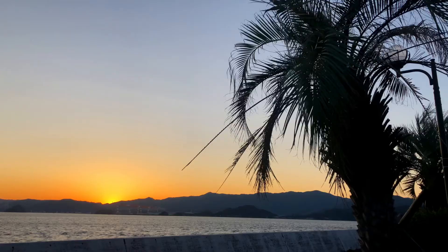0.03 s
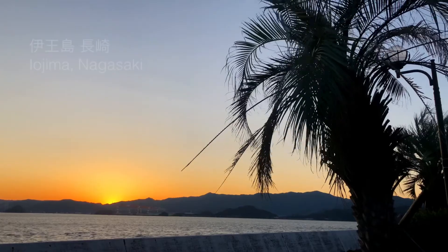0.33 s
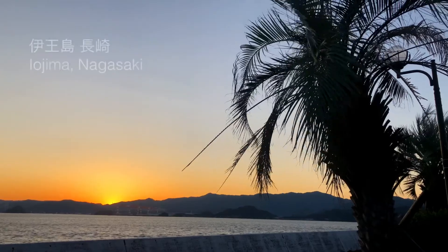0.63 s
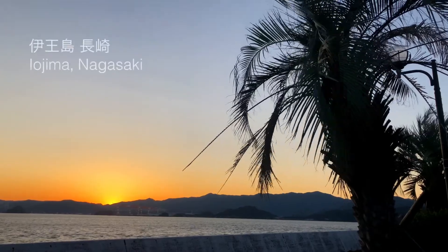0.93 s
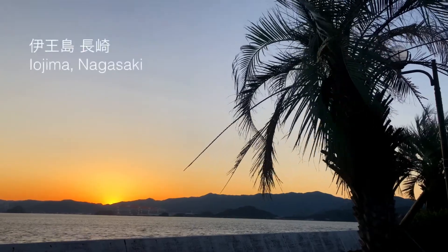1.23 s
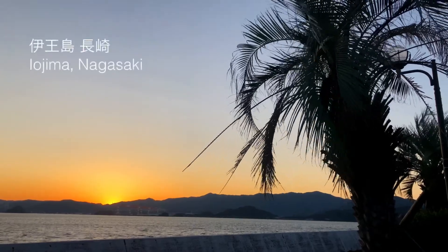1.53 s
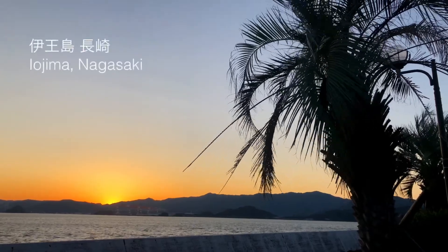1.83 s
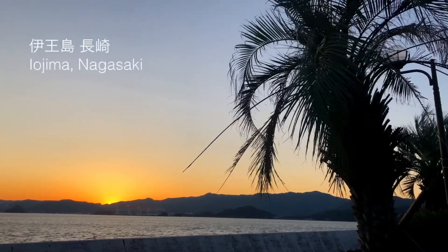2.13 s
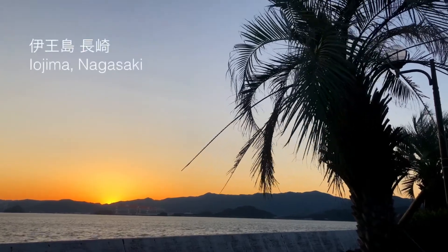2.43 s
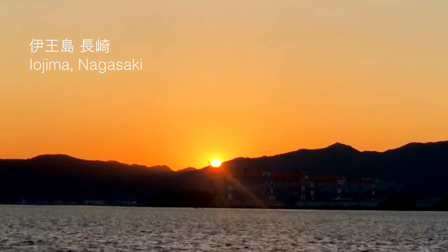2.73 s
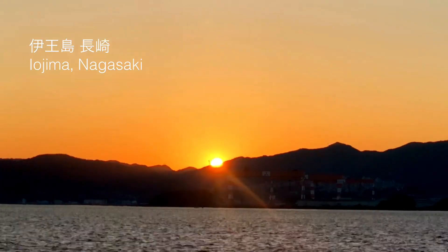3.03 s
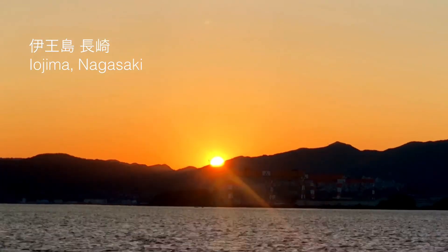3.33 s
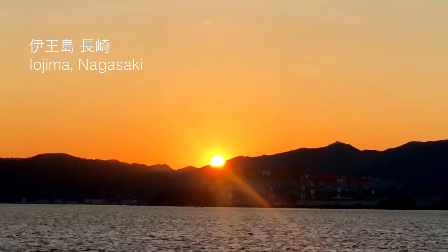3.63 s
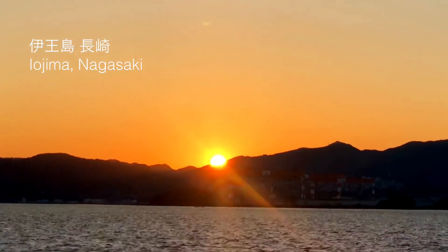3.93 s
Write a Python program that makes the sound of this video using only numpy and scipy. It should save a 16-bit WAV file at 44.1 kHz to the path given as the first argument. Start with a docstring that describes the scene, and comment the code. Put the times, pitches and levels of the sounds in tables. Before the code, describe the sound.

Small sea waves wash steadily against a wall, fading in from silence over about three seconds. A breeze rumbles on the microphone, with soft buffets near 1.3 seconds and from 2.4 to 2.8. A distant boat engine hums in and out, strongest around 2.4. Faint crickets chirp and trill throughout. Water sloshes hollowly around 3.5 seconds, and dry palm leaves tick near 1 and 3.7 seconds.

```python
"""Small waves fade in, washing steadily against a sea wall at dusk, with a hollow slosh now and then.
A breeze rumbles on the microphone and carries a low drone, like a distant boat engine, in and out.
Crickets scrape their wings on the bank: falling notes, short high trills and, later, level chirps.
Dry palm leaves tick against each other over a faint rustle."""
import sys
import numpy as np
from scipy import signal
from scipy.fft import rfft, irfft
from scipy.io import wavfile
from scipy.ndimage import uniform_filter1d

SR = 44100
rng = np.random.default_rng(int(sys.argv[2]) if len(sys.argv) > 2 else 0)


def materialize(psi):
    """Save the field psi as 16-bit PCM at rate SR to the path in sys.argv[1].

    A 1-D psi becomes a single channel; in a 2-D psi each row is a channel.
    """
    bounded = np.clip(np.atleast_2d(psi).T, -1, 1)
    quanta = np.round(bounded * 32767).astype(np.int16)
    wavfile.write(sys.argv[1], SR, quanta)


N = 176400
T = np.arange(N) / SR

# Fader ride of the wash, set in its 900-3000 Hz band: time_s, level_db
WASH_RIDE = [(0.2, -52), (0.5, -50), (0.8, -50), (1.05, -50), (1.3, -50), (1.6, -50.5), (1.9, -50),
             (2.15, -50.5), (2.45, -50), (2.8, -50.5), (3.15, -50.5), (3.5, -50.5), (3.95, -52)]
# EQ of the wash: frequency_hz, gain_db
WASH_EQ = [(18, -29), (45, 12.5), (150, 4.5), (400, 3.5), (750, 0), (1300, -1), (1900, -4.5), (3000, -7.5),
           (5200, -9), (6700, -11), (7700, -13), (8400, -12.5), (9700, -17), (11200, -16.3), (13600, -20.5),
           (15600, -27)]
# Fader ride of the hollow slosh at the wall: time_s, level_db
SLOSH_RIDE = [(.2, -54), (.6, -53), (1.0, -55), (1.6, -74), (2.1, -53), (2.4, -78), (2.9, -55.5),
              (3.45, -48), (3.75, -51), (3.98, -52)]
# EQ of the slosh: frequency_hz, gain_db
SLOSH_EQ = [(30, -55), (150, -28), (330, -0.5), (470, 3), (680, 1.5), (900, -10.5), (1600, -8.5),
            (4000, -49)]

# Fader ride of the breeze, set in its 88-230 Hz band: time_s, level_db
BREEZE_RIDE = [(0.15, -42), (0.6, -42), (1.0, -36), (1.12, -45), (1.48, -43), (1.75, -39.5), (2.05, -42),
               (2.2, -38.5), (2.42, -43.5), (2.62, -45), (2.84, -36.5), (3.0, -44.5), (3.3, -46.5),
               (3.7, -44.5), (3.98, -43.5)]
# EQ of the breeze: frequency_hz, gain_db
BREEZE_EQ = [(10, -40), (22, -53), (32, -23), (42, -13), (58, 2.5), (110, 4), (160, 0), (220, -3.5),
             (270, -6.5), (340, -12), (480, -25), (1200, -37), (4000, -88)]
# Short low thumps, mostly of wind, with a brief low swell at 2.383 s: middle_s, length_s, level_db
LOW_BUFFETS = [(1.23, 0.073, -30), (1.338, 0.039, -28.5), (2.383, .04, -35), (2.45, 0.033, -37),
               (2.526, 0.023, -30.5), (2.84, 0.055, -31)]
# EQ of the buffets: frequency_hz, gain_db
BUFFET_EQ = [(22, -38), (45, 4), (90, -1.5), (150, -2), (240, -6), (340, -9), (480, -37), (1500, -60)]

# Fader ride of the engine's firing tone: time_s, level_db
FIRING_RIDE = [(0.15, -69), (0.38, -39.7), (0.55, -40.5), (0.75, -37.5), (1.3, -42), (1.47, -61),
               (1.62, -61), (2.05, -35.5), (2.18, -59), (2.3, -35.6), (2.42, -30), (2.56, -57), (2.85, -44),
               (3.04, -39), (3.14, -52), (3.55, -50), (3.7, -37.5), (3.9, -61)]
# Steadier tones of the engine: pitch_hz, level_db
ENGINE_OVERTONES = [(146.5, -46), (219, -50.5), (240, -50)]
# Trim on those tones, sinking as the engine draws away: time_s, gain_db
OVERTONE_TRIM = [(.2, -1.5), (1.4, -1.5), (2.6, -0.5), (3.2, -7.5), (4.0, -8)]

# Falling cricket notes: middle_s, pitch_hz, level_db, roughness (0 pure, 1 all rasp)
CRICKET_NOTES = [(.152, 3830, -52, .02), (.23, 3830, -50, 0.05), (.317, 3750, -52, 0.1),
                 (.402, 3740, -54, .05), (.48, 3770, -55, .05), (.56, 3750, -56, 0.2), (.64, 3670, -60, .3),
                 (1.165, 3380, -59, .5), (1.345, 3700, -58, .4), (1.42, 3520, -62, .4),
                 (1.57, 3620, -54, .05), (1.78, 3650, -53, 0.2), (1.955, 3580, -56, .5),
                 (2.01, 3700, -58, .5), (2.445, 3620, -61, .5), (2.53, 3740, -52, 0.9),
                 (2.61, 3870, -53, .7), (2.695, 3730, -54.5, 0.5), (2.805, 3930, -52, 0.8),
                 (2.895, 3880, -60, .6), (2.982, 3870, -53, .6)]
# High cricket trills: start_s, length_s, level_db
CRICKET_TRILLS = [(.405, .07, -53), (0.584, .095, -53.5), (0.787, 0.1, -54), (1.001, 0.075, -53.5),
                  (1.226, 0.092, -53.5), (1.448, 0.094, -54), (2.368, 0.076, -55), (2.541, .09, -53),
                  (2.759, 0.09, -54.5), (2.984, 0.084, -55), (3.191, 0.09, -54), (3.41, 0.09, -55.5)]
# Level cricket chirps: middle_s, level_db
CRICKET_CHIRPS = [(3.058, -54.5), (3.137, -56), (3.222, -55), (3.307, -53), (3.39, -55.5), (3.477, -54.5),
                  (3.558, -54.5), (3.647, -55), (3.73, -54), (3.872, -59), (3.93, -58), (3.988, -56)]

# Frond striking frond: start_s, level_db, decay_s
LEAF_TICKS = [(.42, -44, .006), (.748, -47, .004), (1.026, -38, .004), (1.034, -45, .012),
              (1.233, -45, .005), (1.428, -46, .002), (3.6405, -39, .003), (3.672, -46, .002),
              (3.7662, -31, .0014), (3.769, -41, .003)]
# EQ of the dry leaves: frequency_hz, gain_db
LEAF_EQ = [(1000, -29), (4500, -8), (5400, 3.5), (8500, 2.5), (11000, -2), (13000, -6), (16000, -6)]


def amp(db):
    """Decibels to gain."""
    return 10 ** (np.asarray(db) / 20)


def unit(x):
    """Scales to rms 1."""
    return x / np.sqrt(np.mean(x ** 2) + 1e-20)


def ride(points):
    """A fader move: gain over time from time_s, level_db points."""
    return amp(np.interp(T, *np.transpose(points)))


def add(mix, start_s, sound):
    """Drops a sound into the mix."""
    part = mix[max(round(start_s * SR), 0):][:len(sound)]
    part += sound[:len(part)]


def equalise(x, curve, band_hz=(0, SR)):
    """Applies an EQ curve and scales to rms 1 within the band."""
    hz = np.fft.rfftfreq(N, 1 / SR)
    curve_hz, curve_db = np.transpose(curve)
    spectrum = rfft(x) * amp(np.interp(np.log(hz + 1), np.log(curve_hz), curve_db))
    in_band = (hz >= band_hz[0]) & (hz < band_hz[1])
    return irfft(spectrum, N) / np.std(irfft(spectrum * in_band, N))


def wander(rate_hz):
    """A smooth random modulator of rms 1, rolling off above the rate."""
    hz = np.fft.rfftfreq(N, 1 / SR)
    return unit(irfft(rfft(rng.standard_normal(N)) * (hz > 0) / (1 + (hz / rate_hz) ** 4), N))


def ripples(patch_db, splash_db):
    """Water texture: noise with drifting patches in time and pitch, and brief wide splashes."""
    grid = signal.stft(rng.standard_normal(N), nperseg=512, noverlap=384)[2]

    def blotches(bins, frames):
        across_pitch = uniform_filter1d(rng.standard_normal(grid.shape), bins, axis=0)
        return unit(uniform_filter1d(across_pitch, frames, axis=1))

    gain_db = patch_db * blotches(bins=7, frames=30) + splash_db * blotches(bins=45, frames=4)
    return signal.istft(grid * amp(gain_db), nperseg=512, noverlap=384)[1][:N]


def sea():
    """Small waves make a wide wash; a darker slosh comes and goes at the wall."""
    wash = equalise(ripples(patch_db=0.74, splash_db=0.72), WASH_EQ, band_hz=(900, 3000))
    slosh = equalise(ripples(patch_db=2.2, splash_db=1.3), SLOSH_EQ)
    return wash * ride(WASH_RIDE) + slosh * ride(SLOSH_RIDE)


def wind():
    """The breeze makes a lumpy low rumble, and its eddies land as short buffets; one brief low swell sounds
    among them."""
    lumps_db = 2.46 * wander(rate_hz=23)
    rumble = equalise(rng.standard_normal(N) * amp(lumps_db), BREEZE_EQ, band_hz=(88, 230))
    out = rumble * ride(BREEZE_RIDE)
    eddies = equalise(rng.standard_normal(N), BUFFET_EQ)
    for middle_s, length_s, db in LOW_BUFFETS:
        swell = np.exp(-(2 * (T - middle_s) / length_s) ** 2)
        buffet = eddies * swell
        out += amp(db) * buffet * np.linalg.norm(swell) / np.linalg.norm(buffet)
    return out


def engine(firing_hz=73.37, speed_drift=0.012):
    """A far engine: the wind carries its firing tone in and out over steadier overtones."""
    speed = 1 + speed_drift * wander(rate_hz=4.6)
    out = ride(FIRING_RIDE) * np.sin(2 * np.pi * firing_hz * np.cumsum(speed) / SR)
    for hz, db in ENGINE_OVERTONES:
        gain = ride(OVERTONE_TRIM) * amp(db + 2 * wander(rate_hz=2.06))
        phase_drift = 0.65 * wander(rate_hz=3.1)
        out += gain * np.sin(2 * np.pi * hz * T + phase_drift)
    return np.sqrt(2) * out  # rms levels to sine peaks


def wing(pitch_hz, envelope, roughness):
    """A cricket's wing rings with a tone, blurred into a narrow rasp by the uneven teeth of its file."""
    white = rng.standard_normal((SR // 4, 2)) @ [1, 1j]
    rasp = signal.fftconvolve(white, np.hanning(240), "valid")[:len(pitch_hz)]
    blur = np.sqrt(1 - roughness) + np.sqrt(roughness) * rasp / np.std(rasp)
    tone = np.exp(2j * np.pi * (np.cumsum(pitch_hz) / SR + rng.random()))
    return envelope * unit((blur * tone).real)


def cricket_notes(length_s=0.06, fall_hz_per_s=10580, bend_hz_per_s2=112000):
    """Single wing strokes, each diving ever faster in pitch."""
    out = np.zeros(N)
    t = np.arange(-length_s / 2, length_s / 2, 1 / SR)
    for middle_s, hz, db, roughness in CRICKET_NOTES:
        dive_hz = hz - fall_hz_per_s * t - bend_hz_per_s2 * t ** 2
        add(out, middle_s - length_s / 2, amp(db) * wing(dive_hz, np.hanning(len(t)), roughness))
    return out


def bank_echo(dry, t60_s=0.22, send_db=-6.5):
    """Adds the short scatter from the wall and the plants."""
    t = np.arange(SR // 2) / SR
    tail = rng.standard_normal(len(t)) * amp(-60 * t / t60_s)
    return dry + amp(send_db) * signal.fftconvolve(dry, tail / np.linalg.norm(tail))[:N]


def cricket_trills(upper_hz=4757, lower_hz=4320, strokes_per_s=55, sag_hz=300, roughness=0.85):
    """Quick runs of raspy wing strokes on two pitches, sagging with every stroke."""
    out = np.zeros(N)
    for start_s, length_s, db in CRICKET_TRILLS:
        stroke = np.arange(0, length_s, 1 / SR) * strokes_per_s % 1
        pulses = np.sin(np.pi * stroke) * signal.windows.tukey(len(stroke), 0.25)
        bend_hz = sag_hz * (0.5 - stroke)
        lower = amp(-2.5) * wing(lower_hz + bend_hz, pulses, roughness)
        upper = wing(upper_hz + bend_hz, pulses, roughness)
        add(out, start_s, amp(db) * (upper + lower))
    return out


def leaves(grains_per_s=110, grain_decay_s=0.0018, rustle_db=-65):
    """Dry fronds tick against each other over a faint rustle of tiny random grains."""
    out = np.zeros(N)
    crisp = equalise(rng.standard_normal(N), LEAF_EQ)
    for start_s, db, decay_s in LEAF_TICKS:
        out += amp(db) * crisp * (T >= start_s) * np.exp(-abs(T - start_s) / decay_s)
    triggers = rng.random(N) < grains_per_s / SR
    accents_db = 4.5 * np.minimum(rng.exponential(1, N), 3)
    grains = signal.lfilter([1], [1, -np.exp(-1 / (grain_decay_s * SR))], triggers * amp(accents_db))
    return out + amp(rustle_db) * unit(grains * crisp)


def cricket_chirps(length_s=0.055, pitch_hz=3520, strokes_per_s=55.4, sag_hz=260, throb=0.42):
    """Throbbing chirps around one pitch; each wing stroke sags and the next starts high again."""
    out = np.zeros(N)
    for middle_s, db in CRICKET_CHIRPS:
        stroke = (np.arange(0, length_s, 1 / SR) * strokes_per_s + rng.random()) % 1
        pulses = (1 - throb * np.cos(2 * np.pi * stroke)) * signal.windows.tukey(len(stroke), 0.7)
        chirp = wing(pitch_hz + sag_hz * (0.5 - stroke), pulses, roughness=0.4)
        add(out, middle_s - length_s / 2, amp(db) * chirp)
    return out


def scene():
    """A mono mix on both channels, with echo on the crickets only."""
    bed = sea() + wind() + engine()
    crickets = cricket_notes() + cricket_trills() + cricket_chirps()
    mix = bed + bank_echo(crickets) + leaves()
    return np.array([mix, mix])


def record(dry):
    """Master bus: a linear fade-in, then a steep high cut."""
    fade_start_s, fade_length_s, high_cut_hz = 0.071, 3.165, 15740
    fade = np.clip((T - fade_start_s) / fade_length_s, 0, 1)
    high_cut = signal.firwin(1023, high_cut_hz, window=("kaiser", 9), fs=SR)
    return signal.oaconvolve(dry * fade, high_cut[None], "same")


dry = scene()
out = record(dry)
materialize(out)
```